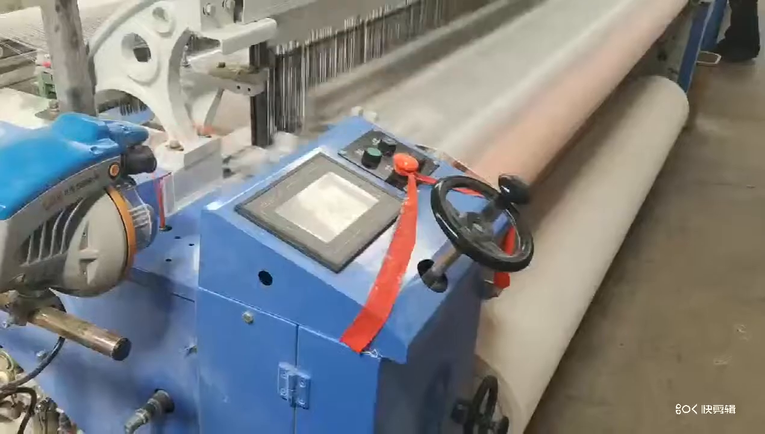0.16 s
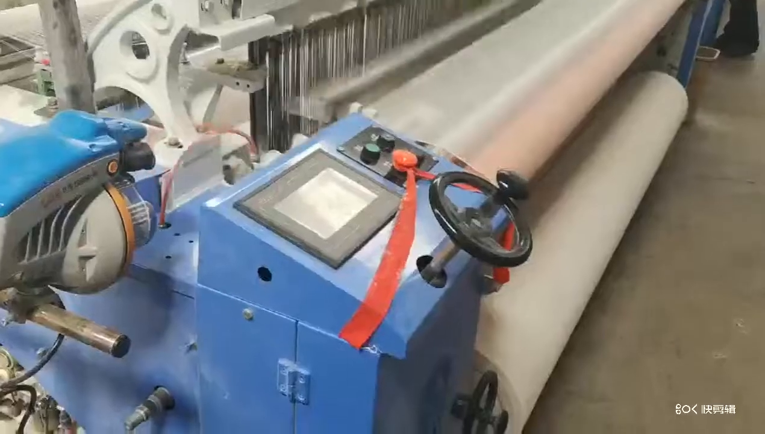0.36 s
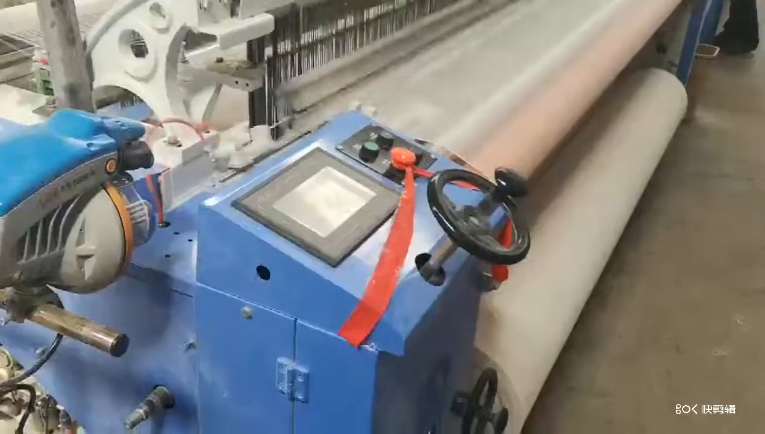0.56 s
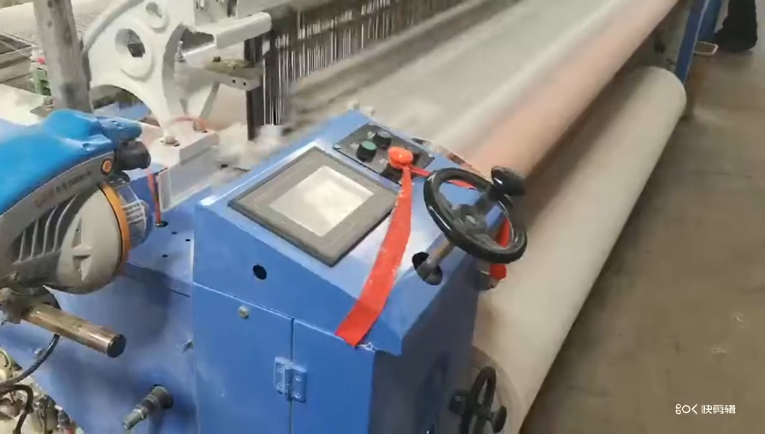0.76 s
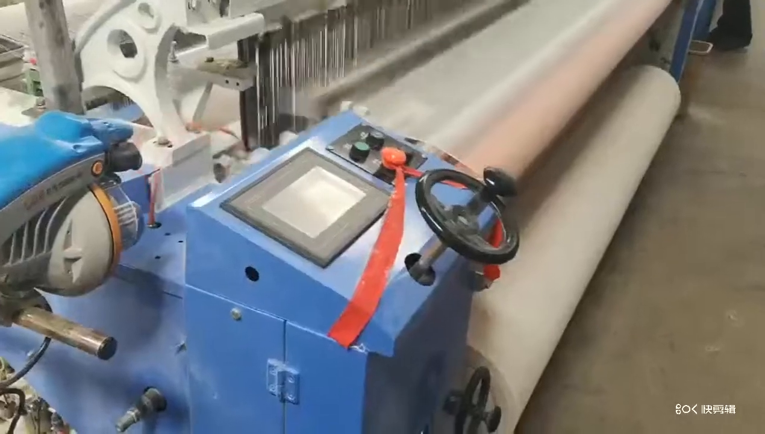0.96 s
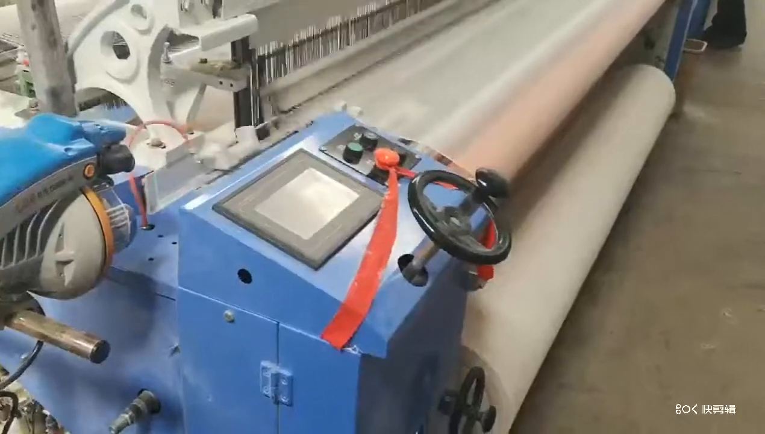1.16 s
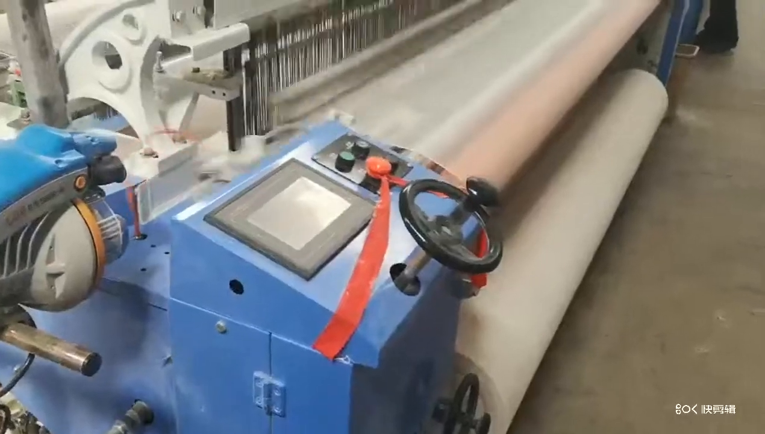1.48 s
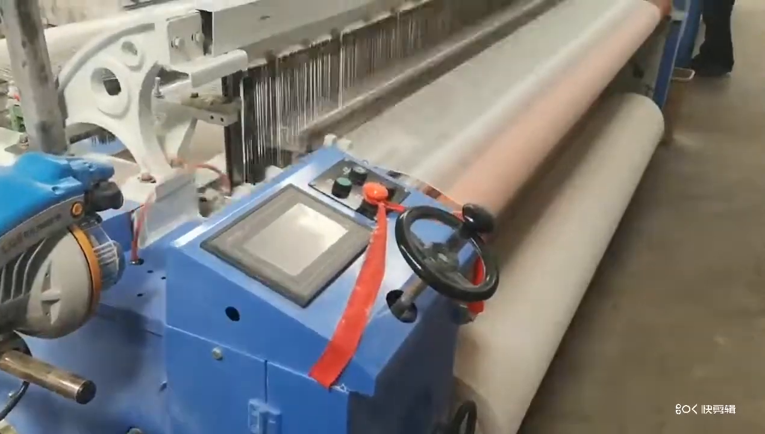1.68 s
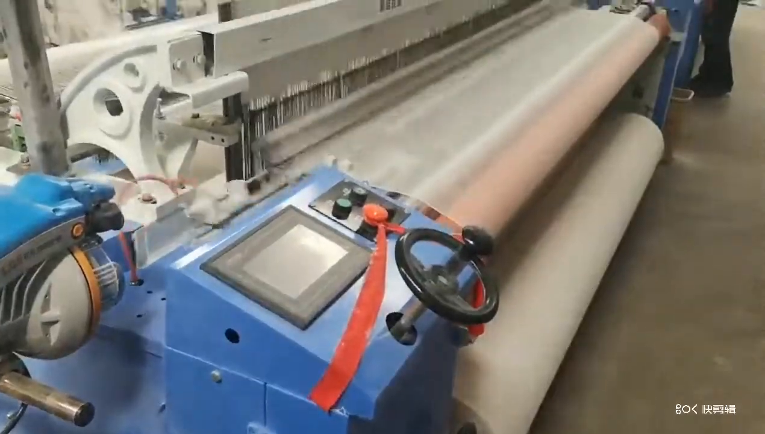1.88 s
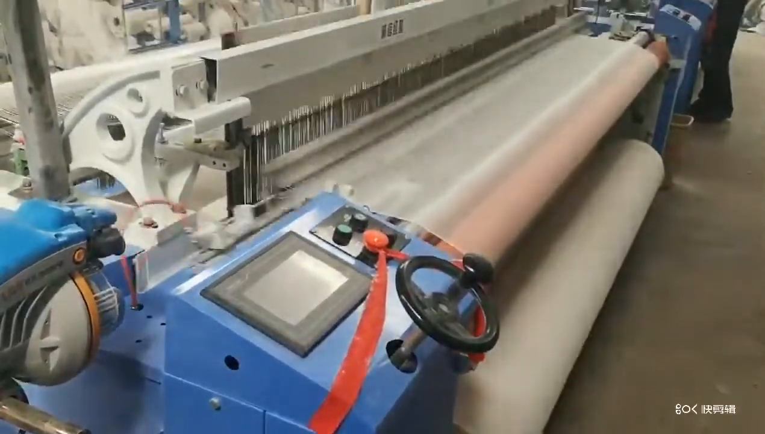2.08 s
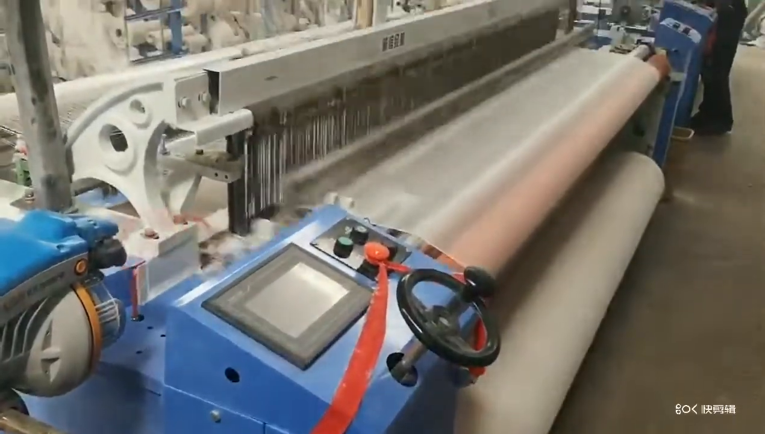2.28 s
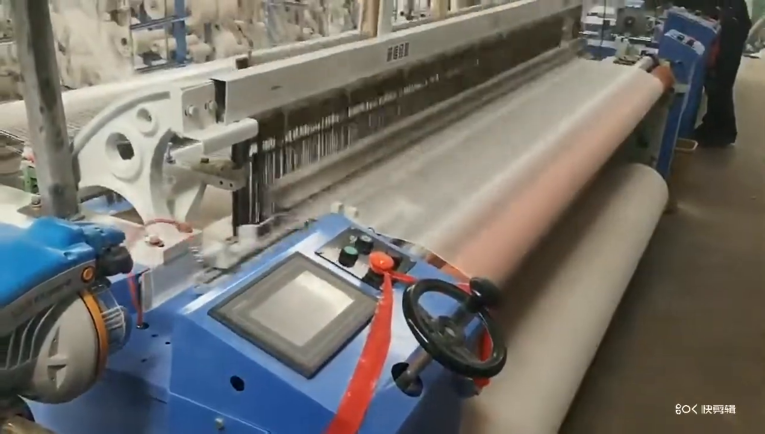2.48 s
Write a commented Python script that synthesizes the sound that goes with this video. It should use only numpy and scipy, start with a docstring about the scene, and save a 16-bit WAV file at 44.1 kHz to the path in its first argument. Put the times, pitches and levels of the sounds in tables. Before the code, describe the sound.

A loud weaving machine clatters about eight beats a second, hissing and thudding amid other looms

```python
"""Air-jet loom at its control desk

A loom weaves about eight picks a second over the wash of a hall full of machines.
In each pick the reed and heald frames clatter as coloured noise and clicks, the nozzles hiss as swelling
noise, and casing, cloth and frame thud and shudder as low resonances; hum and whine are wavering sines.
Brief steel clanks stand out, and the drifting microphone changes the colour of the hiss on the right."""
import sys
import numpy as np
from scipy import signal
from scipy.fft import rfft, irfft, next_fast_len
from scipy.io import wavfile

SR = 44100
rng = np.random.default_rng(int(sys.argv[2]) if len(sys.argv) > 2 else 0)


def file_out(sig):
    """Save sig as 16-bit WAV at sys.argv[1]."""
    # one column per channel
    cols = np.atleast_2d(sig).T
    # limit, then scale
    lim = np.clip(cols, -1, 1)
    pcm = np.round(lim * 32767).astype(np.int16)
    wavfile.write(sys.argv[1], SR, pcm)


N = 115542
T = np.arange(N) / SR  # seconds
PICK_HZ, FIRST_BEAT_S = 8.304, .339
HALF_EACH_WAY = np.array([[.5], [-.5]])  # splits a left-minus-right difference over the two channels


def from_db(db):
    """Decibels to gain."""
    return 10 ** (np.asarray(db) / 20)


def rms_one(x):
    """Scale to rms 1."""
    return x / np.sqrt(np.mean(x ** 2) + 1e-20)


def at_hz(points, hz):
    """Read a table on a log-frequency axis."""
    f, value = np.transpose(points)
    return np.interp(np.log(hz + 1e-6), np.log(f), value)


def over_time(points):
    """Gain that follows a table of time and dB."""
    s, db = np.transpose(points)
    return from_db(np.interp(T, s, db))


def drift(rate):
    """Random wander of rms 1, with this many straight segments a second."""
    knots = rng.standard_normal(4096)
    return rms_one(np.interp(T * rate, np.arange(len(knots)), knots))


def each_pick(swing):
    """A gain that repeats with every turn of the main shaft."""
    share, db = np.transpose(swing)
    return from_db(np.interp((T - FIRST_BEAT_S) * PICK_HZ, share, db, period=1))


def since_beat(crest_s, wrap=.5):
    """Seconds from a crest after each beat-up; turns negative at this share of a pick past the crest."""
    picks = (T - FIRST_BEAT_S - crest_s) * PICK_HZ
    return ((picks + 1 - wrap) % 1 - (1 - wrap)) / PICK_HZ


def band_pass(x, low_hz, high_hz):
    """Let one resonant band of a sound through."""
    band = signal.butter(2, [low_hz, high_hz], "band", fs=SR, output="sos")
    return signal.sosfilt(band, x)


def spectrum_axis():
    """Padded transform size and the frequencies of its bins in Hz."""
    size = next_fast_len(N + 4096)
    return size, np.arange(size // 2 + 1) * SR / size


# balance of the clatter and hiss: pitch_hz, left_minus_right_db
LEFT_RIGHT = [(420, -0.5), (490, -0.5), (650, 0.5), (790, 1.5), (960, 2.5), (1350, -2.5), (1850, 0.5),
              (2250, -1), (2800, -7.5), (3400, -2), (4100, -1), (5200, 1.5), (6400, -1.5), (7300, -2.5),
              (8700, -2.5), (9900, -5), (11500, -9), (13400, -15), (14800, -9.5)]
# likeness of left and right: pitch_hz, correlation (-1 to 1)
LIKENESS = [(160, .999), (260, 0.87), (430, 0.53), (560, 0.49), (690, -0.3), (860, 0.61), (1200, 0.9),
            (1400, 0.4), (1600, 0.24), (1950, 0.12), (2250, 0.16), (2600, 0.37), (2850, -0.22),
            (3400, 0.031), (9000, 0.0039)]


def stereo(pair, colour):
    """Mix two unrelated signals to the likeness of left and right, with this colour; rms 1."""
    size, hz = spectrum_axis()
    a, b = rfft(pair, size) * from_db(at_hz(colour, hz))
    # crossing over by this angle gives a correlation of sin(2 * turn)
    turn = np.arcsin(np.clip(at_hz(LIKENESS, hz), -1, 1)) / 2
    left = a * np.cos(turn) + b * np.sin(turn)
    right = b * np.cos(turn) + a * np.sin(turn)
    pan = from_db(at_hz(LEFT_RIGHT, hz) * HALF_EACH_WAY)
    pan = pan / np.sqrt(np.mean(pan ** 2, axis=0))
    return rms_one(irfft(np.array([left, right]) * pan, size)[:, :N])


# colour of the other looms: pitch_hz, level_db
HALL_COLOUR = [(30, -2), (60, -0.5), (90, 3), (150, 2.5), (205, -1.5), (260, -2), (345, -4.5), (410, -3.5),
               (520, -11), (720, -13.5), (830, -5.5), (1300, -3.5), (1600, -3), (2500, -3.5), (3700, -6.5),
               (7400, -13.5), (15000, -20)]


def hall():
    """The many other looms blur into steady coloured noise."""
    return from_db(-25) * stereo(rng.standard_normal((2, N)), HALL_COLOUR)


def strike_metal(clicks, t60):
    """Clicks excite one steel part, whose dense, quickly dying modes ring as decaying noise."""
    t = T[:SR // 5]
    ring = rng.standard_normal((2, len(t))) * from_db(-60 * t / t60)
    return signal.fftconvolve(clicks[None], ring, axes=1)[:, :N]


# rattle through the pick: share_of_pick after the beat-up, level_db
RATTLE_SWING = [(0, 0.5), (.14, 1), (.3, 0.5), (.55, -1.5), (.75, -4.5), (.85, 0), (.95, 0.5)]
# colour of the rattle: pitch_hz, level_db
RATTLE_COLOUR = [(150, -23), (255, -4.5), (340, -9.5), (410, -5.5), (520, -15), (720, -13.5), (815, -9.5),
                 (960, -4.5), (1330, -7), (1560, -5.5), (1900, 0.5), (2250, -3.5), (2720, -1.5),
                 (3050, -10.5), (3500, -7), (4300, -11.5), (6000, -7), (9000, -10.5), (15000, -40)]
RATTLE_DB, RATTLES_PER_S, RATTLE_SPREAD_DB, RATTLE_T60_S = -22, 1900, 2, 0.024


def healds(count=8):
    """Many small steel healds rattle in their frames: random clicks shared among a few ringing parts."""
    sizes = from_db(RATTLE_SPREAD_DB * np.minimum(rng.exponential(1, N), 3))
    struck = rng.random(N) < RATTLES_PER_S / SR
    clicks = sizes * struck * each_pick(RATTLE_SWING)
    part = rng.integers(0, count, N)
    rattle = sum(strike_metal(clicks * (part == k), RATTLE_T60_S) for k in range(count))
    return from_db(RATTLE_DB) * stereo(rattle, RATTLE_COLOUR)


# air flow of the nozzles: share_of_pick after the beat-up, level_db
JET_SWING = [(.03, -2.1), (.16, -0.2), (.35, 0.8), (.52, -1.2), (.66, -2.5), (.78, -5.5), (.92, -5)]
# colour of the hiss: pitch_hz, level_db
JET_COLOUR = [(900, -28), (1700, -10), (2750, 1), (3150, -2.5), (3500, -10), (3900, -8.5), (4350, -4),
              (5100, -3), (5900, -5), (6350, -5.5), (7300, -1), (8000, -3), (8400, -4.5), (9400, -2.5),
              (10000, -6.5), (11300, -6.5), (12500, -6.5), (13400, -4), (14100, -7.5), (15000, -8.5)]
JET_DB, JET_FLUTTER_DB, JET_SPREAD_DB = -19, -1, 0.3


def jets():
    """The nozzles blow the weft across once per pick: turbulent noise that swells and flutters."""
    flutter = from_db(JET_FLUTTER_DB * drift(400) + JET_SPREAD_DB * drift(12))
    flow = rms_one(each_pick(JET_SWING) * flutter)
    return from_db(JET_DB) * flow * stereo(rng.standard_normal((2, N)), JET_COLOUR)


# resonances of the casing: pitch_hz, width_hz, level_db
RUMBLE_MODES = [(131.8, 50, 0.5), (262.4, 64, -2.5), (420.5, 58, -8.5), (510, 21, -17)]
# level of the rumble: time_s, lowest_resonance_db, higher_resonances_db
RUMBLE_LEVEL = [(.3, -36, -37), (.9, -35.5, -33), (1.3, -36, -33), (1.6, -45, -42.5), (1.79, -46, -28.5),
                (1.9, -42, -36.5), (2.6, -41, -35)]


def rumble():
    """Running gear keeps the casing's resonances rumbling: noise in narrow bands."""
    s, lowest_db, higher_db = np.transpose(RUMBLE_LEVEL)
    out = 0
    for k, (hz, width_hz, db) in enumerate(RUMBLE_MODES):
        band = band_pass(rng.standard_normal(N), hz - width_hz / 2, hz + width_hz / 2)
        level = from_db(db + np.interp(T, s, higher_db if k else lowest_db))
        out = out + level * rms_one(band)
    return out


# the frame's shake through the pick: share_of_pick after the beat-up, level_db
SHUDDER_SWING = [(0, -4), (.2, -1.5), (.42, 7.5), (.6, -4), (.75, 4.5), (.88, -1)]
# level of the shudder: time_s, level_db
SHUDDER_LEVEL = [(.3, -29), (.72, -28.5), (1.0, -31), (1.7, -32.5), (2.15, -34), (2.55, -33.5)]
SHUDDER_HZ, SHUDDER_CREST_S = 37.2, 0.0475


def shudder():
    """The swinging sley shakes the whole frame at its lowest mode, in step with the picks."""
    phase = 2 * np.pi * SHUDDER_HZ * since_beat(SHUDDER_CREST_S, wrap=.4)
    shake = each_pick(SHUDDER_SWING) * np.cos(phase + 0.33 * drift(25))
    smooth = signal.butter(2, 2 * SHUDDER_HZ, fs=SR, output="sos")
    return over_time(SHUDDER_LEVEL) * rms_one(signal.sosfiltfilt(smooth, shake))


WANDER_RAD = 0.44  # phase wander of the hum and the drive tones
# the hum throbs with the load: share_of_pick after the beat-up, level_db
HUM_SWING = [(0, 2), (.22, -6.5), (.42, 0), (.65, 3.5), (.85, 0)]
# level of the hum: time_s, level_db
HUM_LEVEL = [(.3, -34), (.9, -34.5), (1.25, -38.5), (1.6, -40.5), (1.95, -39.5), (2.6, -38)]
HUM_HZ = 124.56


def hum():
    """The motor labours and eases once in every pick: a throbbing sine."""
    tone = np.sin(2 * np.pi * HUM_HZ * T + WANDER_RAD * drift(14))
    return over_time(HUM_LEVEL) * rms_one(each_pick(HUM_SWING) * tone)


# drive hum and whine: pitch_hz, level_db, left_minus_right_db
DRIVE = [(249.1, -38.3, 0), (941.7, -47, 3), (4801.5, -44.8, -5), (4951, -46, -2), (6593, -49, -6)]
DRIVE_WAVER_DB = 1


def drive():
    """Motor and gears sing as sines that waver in phase and level."""
    out = 0
    for hz, db, pan_db in DRIVE:
        tone = np.sin(2 * np.pi * hz * T + WANDER_RAD * drift(15))
        tone = tone * from_db(DRIVE_WAVER_DB * drift(22))
        out = out + rms_one(tone) * from_db(db + pan_db * HALF_EACH_WAY)
    return out


# loose steel parts clank now and then: time_s, pitch_hz, level_db, left_minus_right_db
CLANKS = [(.256, 1760, -21.5, 0), (.501, 1335, -23, -2), (.719, 2153, -23, 6), (.950, 2325, -20, 4),
          (.963, 1291, -26, 3), (1.192, 1378, -26, -1), (1.205, 2800, -23, -5), (1.813, 7400, -22, -7),
          (1.907, 2540, -23, -10), (2.038, 7235, -22, -7), (2.058, 2250, -20, 0), (2.075, 2100, -20, 2),
          (2.147, 2756, -20, -9), (2.267, 2670, -21, -8), (2.427, 1248, -23, 1), (2.522, 2210, -19, -2),
          (2.560, 6632, -17.5, -8)]
CLANK_WIDTH, CLANK_DECAY_S = 0.15, 0.012  # width as a share of the pitch; time to fall to 1/e


def clanks():
    """Loose steel rings briefly: bursts of narrow-band noise with a fast attack and decay."""
    out = 0
    for s, hz, db, pan_db in CLANKS:
        noise = rng.standard_normal((2, N))
        ring = rms_one(band_pass(noise, hz * (1 - CLANK_WIDTH / 2), hz * (1 + CLANK_WIDTH / 2)))
        age = np.maximum(T - s, 0)
        burst = np.minimum(age / 0.0015, 1) * np.exp(-age / CLANK_DECAY_S)
        out = out + from_db(db + pan_db * HALF_EACH_WAY) * ring * burst
    return out


# knocks within one pick: delay_s after the beat-up, force_db
KNOCKS = [(.000, 1), (.012, -3), (.024, -3.5), (0.037, -4.5), (.054, -6), (.102, -10.5)]
KNOCK_SPREAD_DB = 1


def knock_clicks(play_s):
    """All contacts of every pick as clicks, with a little play in time and force."""
    clicks = 0
    for delay, db in KNOCKS:
        beats = FIRST_BEAT_S + np.arange(-1, 20) / PICK_HZ
        chance = rng.standard_normal((len(beats), 2))
        at = ((beats + delay + play_s * chance[:, 0]) * SR).astype(int)
        force = from_db(db + KNOCK_SPREAD_DB * chance[:, 1])
        clicks = clicks + np.bincount(np.maximum(at, 0), force, N)[:N]
    return clicks


# force of the beat-up as heard from the drifting microphone: time_s, clack_db, thud_db
BEAT_LEVEL = [(.33, 0.5, 0), (.75, -1.5, -8), (1.07, -2, -1), (1.32, -2.5, -1), (1.55, -1, 4.5),
              (1.67, 0, 2), (1.79, -0.5, -2), (1.92, 1, 6), (2.03, -1, -5), (2.15, 2.5, 3), (2.33, -3, -8),
              (2.519, 1.5, 3)]
# colour of the knocks: pitch_hz, level_db
KNOCK_COLOUR = [(100, -31), (300, -3.5), (520, -6), (730, -9), (850, -8.5), (1300, 0), (1600, -5),
                (2200, -3.5), (2750, 0.5), (3600, -10), (7000, -12.5), (15000, -33)]
KNOCK_DB, KNOCK_JITTER_S, KNOCK_T60_S = -29, 0.00119, 0.072


def reed():
    """The beat-up and the shedding gear's knocks ring dense steel modes: noise that dies after each click."""
    s, clack_db, _ = np.transpose(BEAT_LEVEL)
    clicks = knock_clicks(KNOCK_JITTER_S)
    # overlapping rings add up in energy
    energy_fade = np.exp(-2 * np.log(1000) / (KNOCK_T60_S * SR))
    energy = signal.lfilter([1], [1, -energy_fade], clicks ** 2)
    ringing = rms_one(np.sqrt(energy + 1e-18))
    level = from_db(KNOCK_DB + np.interp(T, s, clack_db))
    return level * ringing * stereo(rng.standard_normal((2, N)), KNOCK_COLOUR)


# modes of the casing panels: pitch_hz, level_db, t60_s
PANELS = [(80, -36.5, 0.073), (106, -35, 0.058), (151, -34.5, 0.14), (285, -34.5, 0.063), (306, -35, 0.056),
          (416, -33.5, 0.053)]
PANEL_PLAY_S, PANEL_TOP_HZ = 0.00053, 416  # the casing is struck almost in strict time


def panels():
    """Knocks in the same pattern set the casing thudding: clicks into decaying two-pole resonators."""
    out = 0
    for hz, db, t60 in PANELS:
        clicks = knock_clicks(PANEL_PLAY_S)
        r = np.exp(-np.log(1000) / (t60 * SR))  # loss per sample
        w = 2 * np.pi * hz / SR
        mode = signal.lfilter([.5, 0, -.5], [1, -2 * r * np.cos(w), r * r], clicks + 1e-18)
        out = out + from_db(db) * mode
    return signal.sosfilt(signal.butter(2, PANEL_TOP_HZ, fs=SR, output="sos"), out)


# the thud crests just after each beat-up; the width is the spread of its bell-shaped swell
THUD_HZ, THUD_DB, THUD_WIDTH_S, THUD_CREST_S = 112, -29, 0.01, 0.01085


def thud():
    """The taut cloth takes each beat-up like a drum skin: a short swell of a low cosine."""
    s, _, thud_db = np.transpose(BEAT_LEVEL)
    since = since_beat(THUD_CREST_S)
    swell = np.exp(-.5 * (since / THUD_WIDTH_S) ** 2)
    tone = np.cos(2 * np.pi * THUD_HZ * since + .5 * drift(10.37))
    return from_db(THUD_DB + np.interp(T, s, thud_db)) * swell * tone


def bell(hz, centre_hz, width_hz):
    """Bell curve over frequency, 1 at its centre."""
    return np.exp(-.5 * ((hz - centre_hz) / width_hz) ** 2)


# colour on the right: time_s, peak_hz, peak_db, treble_db, presence_db
RIGHT_COLOUR = [(.3, 7970, -1, 2, -1.5), (1.05, 8000, 1, 2.5, -1.5), (1.5, 7700, 6.5, 2, 0),
                (1.75, 7250, 8.3, -0.2, 0.5), (2.15, 7100, 7.5, -3.5, 1.5), (2.5, 6830, 7.7, -2.8, -0.5)]
# level on the left: time_s, level_db
LEFT_LEVEL = [(.3, 1.3), (1.2, 1.03), (1.9, -0.3), (2.6, 0.2)]
PEAK_WIDTH_HZ, LOWER_PEAK_HZ, LOWER_PEAK_SHARE = 380, 5960, 0.34  # share of the peak's dB
TREBLE_HZ, TREBLE_WIDTH_HZ, PRESENCE_HZ, PRESENCE_WIDTH_HZ = 11500, 2400, 2684, 410


def move_microphone(x):
    """The drifting microphone hears a hiss peak slide down and the top fade on the right."""
    hz, s, right = signal.stft(x[1], SR, nperseg=512)
    times, *columns = np.transpose(RIGHT_COLOUR)
    peak_hz, peak_db, treble_db, presence_db = [np.interp(s, times, c) for c in columns]
    hz = hz[:, None]
    db = peak_db * bell(hz, peak_hz, PEAK_WIDTH_HZ)
    db = db + LOWER_PEAK_SHARE * peak_db * bell(hz, LOWER_PEAK_HZ, PEAK_WIDTH_HZ)
    db = db + treble_db * bell(hz, TREBLE_HZ, TREBLE_WIDTH_HZ)
    db = db + presence_db * bell(hz, PRESENCE_HZ, PRESENCE_WIDTH_HZ)
    right = signal.istft(right * from_db(db), SR)[1][:N]
    return np.array([x[0] * over_time(LEFT_LEVEL), right])


# narrow resonances and dips of the desk and guards: pitch_hz, width_hz, left_db, right_db
GUARDS = [(812, 13.7, 8, 3), (1350, 22, 2, 3), (2227, 29, 1, 3.5), (3810, 24, 5.5, 0.5),
          (4420, 29, 8.5, -10), (4440, 160, -4, 0), (8020, 70, 5, 0.5), (9600, 87, -3, 2.5),
          (10550, 100, 0, 4.5)]
# lead of the left channel over the right: pitch_hz, phase_rad
LEFT_LEAD = [(170, 0.043), (260, 0.32), (450, -0.95), (600, -0.32), (820, 0.61), (1050, 0.19), (1250, -.05),
             (1500, 0.036), (2200, 0.0049)]
MONO_BELOW_HZ = 140


def arrive(x):
    """Guards colour the sound; it reaches left and right slightly apart, the bass alike at both."""
    size, hz = spectrum_axis()
    db = 0
    for centre_hz, width_hz, left_db, right_db in GUARDS:
        db = db + np.array([[left_db], [right_db]]) * bell(hz, centre_hz, width_hz)
    lead = np.exp(1j * at_hz(LEFT_LEAD, hz) * HALF_EACH_WAY)
    both = rfft(x, size) * from_db(db) * lead
    mid = both.mean(axis=0)
    apart = 1 - 1 / (1 + (hz / MONO_BELOW_HZ) ** 4)
    return irfft(mid + (both - mid) * apart, size)[:, :N]


def scene():
    """The near loom over the wash of the other looms."""
    clatter_and_hiss = reed() + healds() + jets() + hall()
    body = panels() + thud() + rumble() + shudder() + hum() + drive()
    return arrive(move_microphone(clatter_and_hiss) + clanks() + body)


START_S, LOW_CUT_HZ, CUTOFF_HZ = .253, 8, 15200
CEILING = .88  # full scale is 1


def record(dry):
    """The sound cuts in abruptly; the highest peaks are rounded and the top is cut steeply."""
    lean = signal.sosfilt(signal.butter(2, LOW_CUT_HZ, "high", fs=SR, output="sos"), dry)
    opened = lean * (T >= START_S)
    rounded = opened / (1 + (opened / CEILING) ** 6) ** (1 / 6)
    return signal.sosfilt(signal.ellip(12, .1, 80, CUTOFF_HZ, fs=SR, output="sos"), rounded)


dry = scene()
out = record(dry)
file_out(out)
```